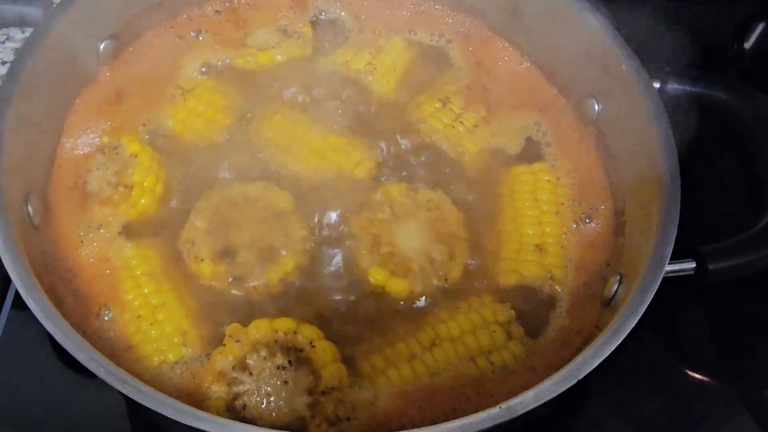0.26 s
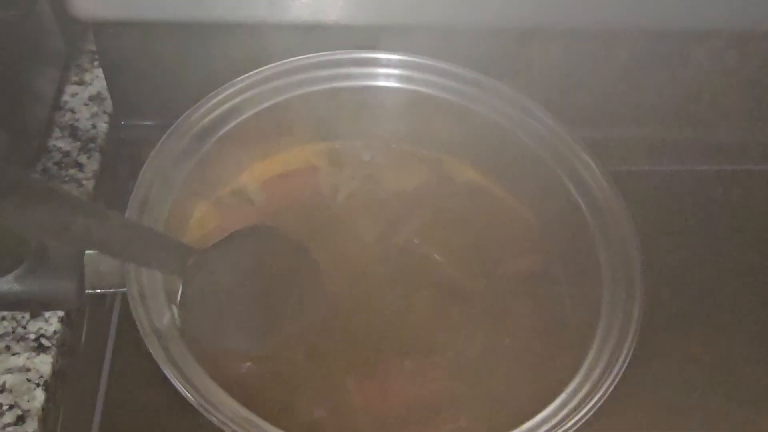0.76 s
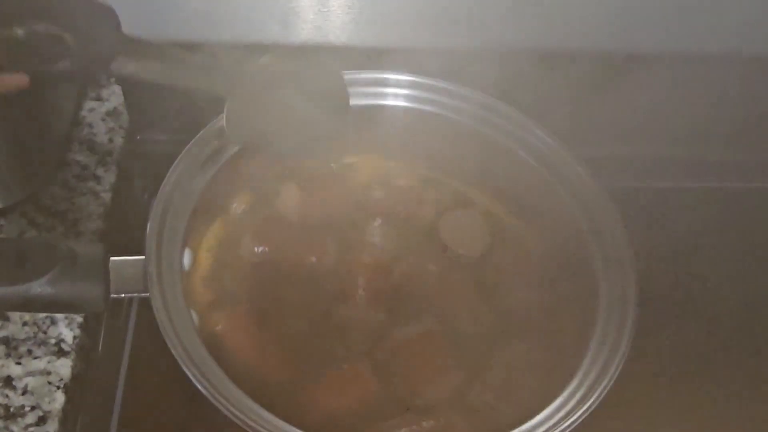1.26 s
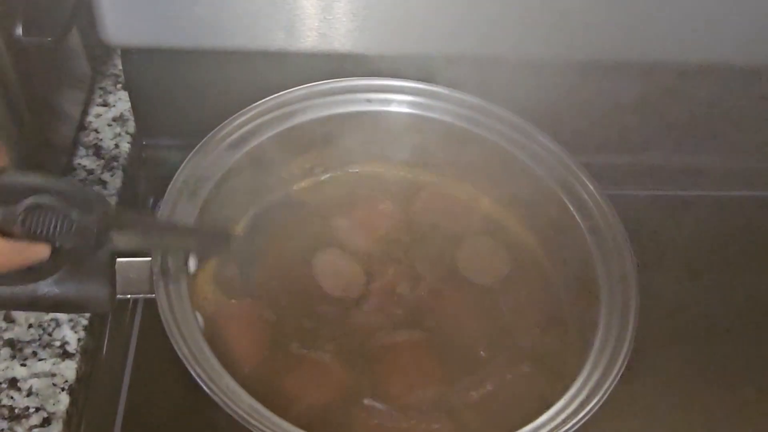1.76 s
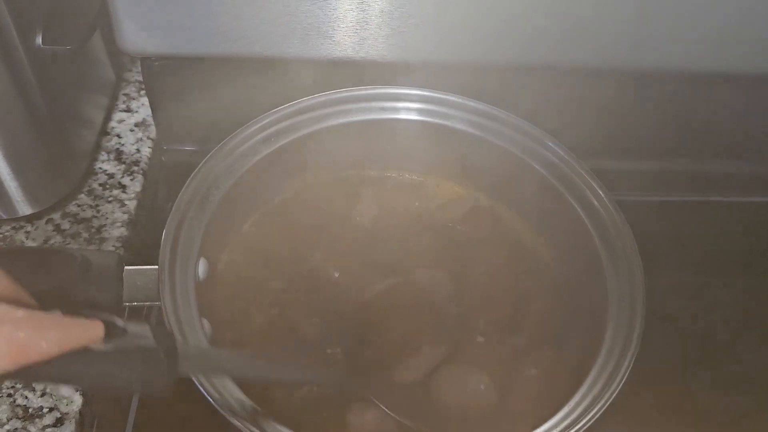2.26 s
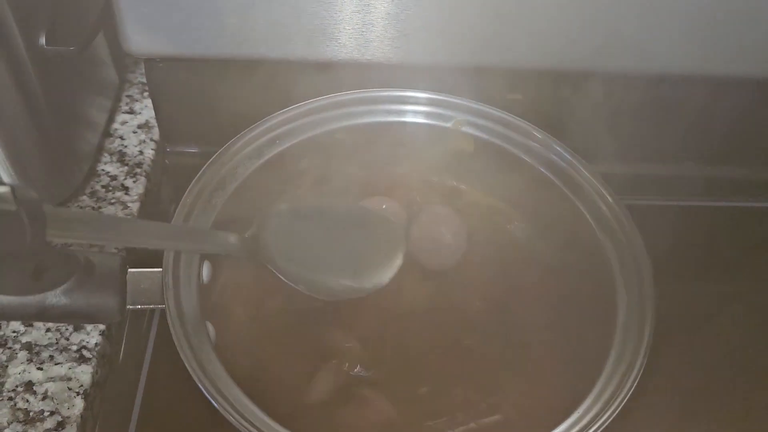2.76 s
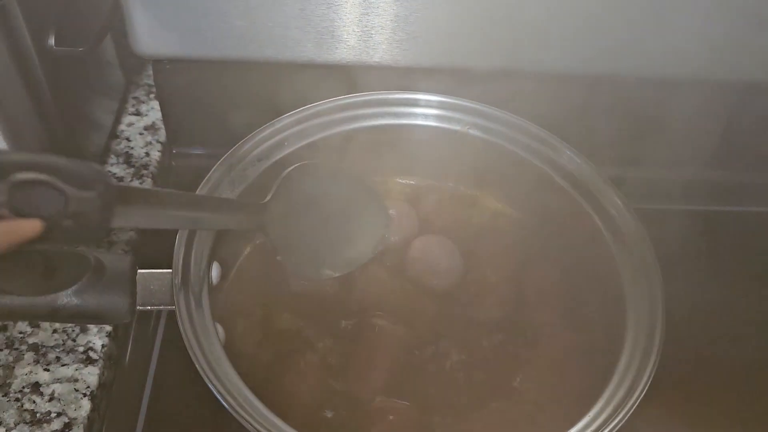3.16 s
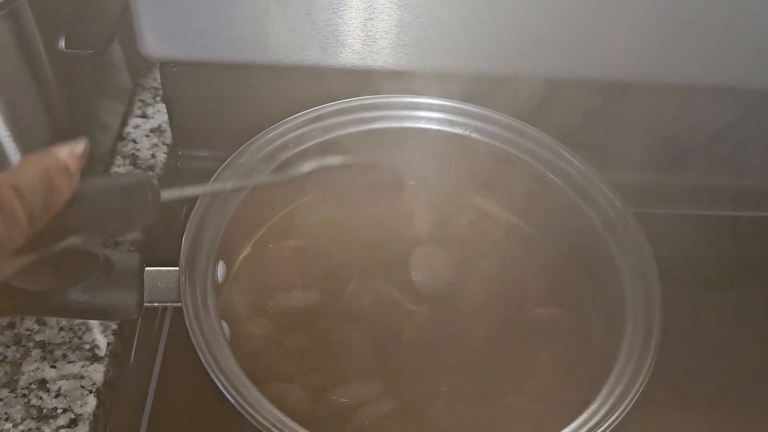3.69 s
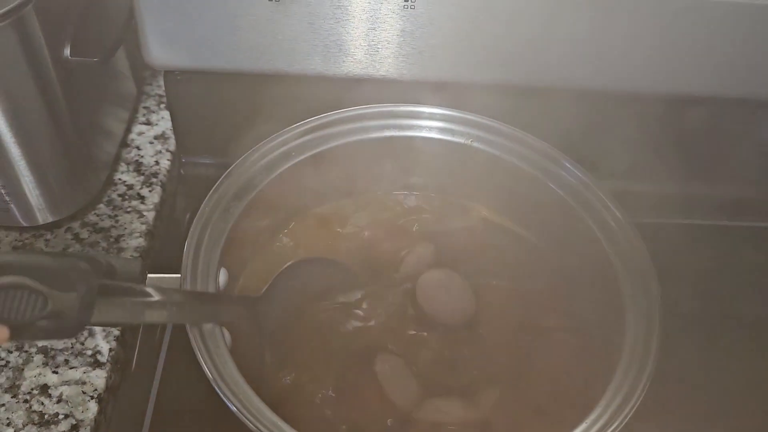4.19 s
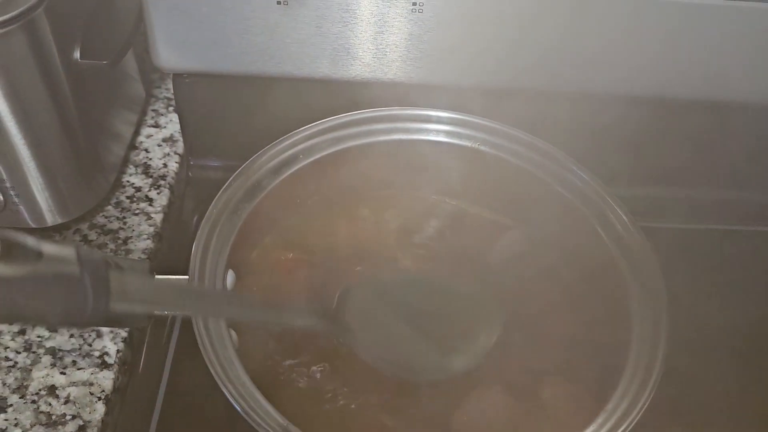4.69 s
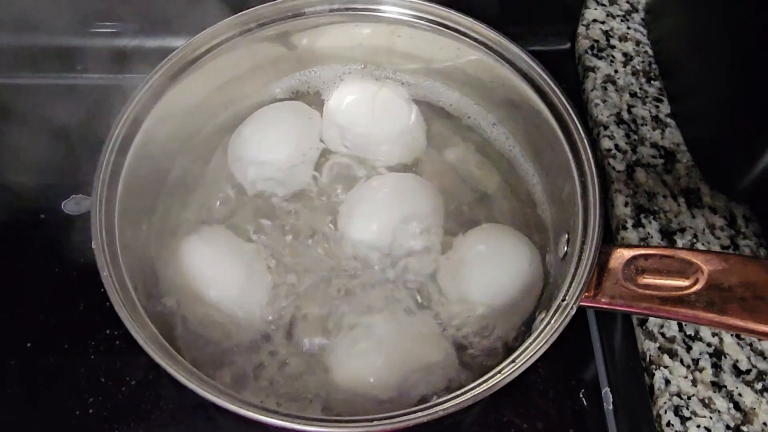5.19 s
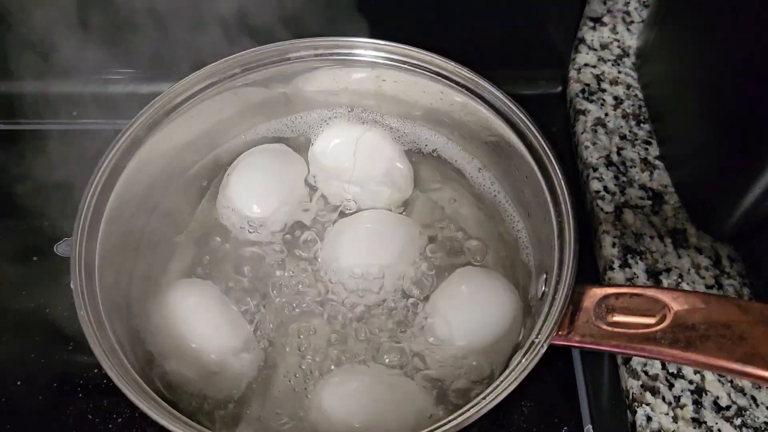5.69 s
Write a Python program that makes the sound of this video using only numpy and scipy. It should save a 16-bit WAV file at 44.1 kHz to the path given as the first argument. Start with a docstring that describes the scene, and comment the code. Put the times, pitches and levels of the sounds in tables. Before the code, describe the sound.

A pot boils close by, with low bubble thumps, higher pops and a fine fizz over the hiss and hum of an extractor fan. At about 0.65 seconds everything cuts out for an instant and a second pot takes over. From 0.7 to 1.9 seconds steel tongs, slightly left, clink against its wall and rim, ringing briefly, scraping and squeaking with a light kitchen echo. Louder plops and spitting droplets stand out from about 1.7 to 3.6 seconds, with one more clink near 2.9. Two strong clinks land at 3.6 and 3.85, followed by scrapes and small squeaks, then a faint hinge creak around 4.3 to 4.5. Another split-second silence comes at 4.8. A third pot then boils, and from 5 seconds until the end near 6, eggs knock softly and irregularly against the steel. The fan changes tone slightly with each pot.

```python
"""Steam bubbles thump and pop in a boiling pot, over the hiss and hum of an extractor fan. Three pots boil one
after another; the scene changes twice, each time after a brief silence. Big bubbles collapse at the bottom,
small ones burst at the surface, and droplets spit. In the second pot steel tongs clink and ring the steel,
scrape and squeak by stick-slip friction, and creak at the hinge. In the third, eggs knock on the steel."""
import sys
import numpy as np
from scipy import signal
from scipy.fft import rfft, irfft, next_fast_len
from scipy.io import wavfile
from scipy.ndimage import uniform_filter1d

SR = 44100
rng = np.random.default_rng(int(sys.argv[2]) if len(sys.argv) > 2 else 0)


def store_pcm(level_fs):
    """Save levels as 16-bit WAV."""
    pcm = np.round(np.clip(level_fs, -1, 1) * 32767).astype(np.int16)
    wavfile.write(sys.argv[1], SR, np.atleast_2d(pcm).T)


N = 261954
T = np.arange(N) / SR

# Each row: time in seconds, thump level in dB, pop level in dB.
BOIL_LEVELS = [(0.0, -43, -48), (0.54, -47, -57), (0.86, -39.5, -47.5), (1.1, -47, -49.5),
               (1.55, -41, -53.5), (1.751, -45.5, -41), (2.18, -43, -46.5), (2.4, -49, -49),
               (2.9, -46, -47), (3.5, -48, -49), (3.85, -40.5, -48.5), (4.3, -46.5, -48.5),
               (4.65, -41.5, -47.5), (4.98, -46, -52), (5.2, -44.5, -46.5), (5.5, -46.5, -60),
               (5.94, -42.5, -49)]
# Each row: start in seconds, level in dB, pitch in Hz.
LOUD_BUBBLES = [(0.161, -22.5, 202), (0.322, -31, 775), (0.526, -36, 660), (1, -22.5, 165),
                (1.74, -22.5, 199), (1.773, -17.5, 806), (1.884, -34, 687), (1.918, -25, 208),
                (2.004, -33, 620), (2.018, -27, 202), (2.065, -29, 590), (2.142, -31, 178),
                (2.324, -39, 730), (2.349, -31, 205), (2.378, -27, 840), (2.429, -31, 220),
                (2.495, -36, 850), (2.513, -17, 895), (2.581, -27.5, 181), (2.659, -26.5, 188),
                (2.697, -30.5, 870), (2.713, -24, 880), (2.804, -29, 187), (2.825, -28.5, 945),
                (2.99, -23.5, 865), (3.131, -25.5, 144), (3.132, -28.5, 770), (3.196, -25, 195),
                (3.276, -25.5, 197), (3.308, -29.5, 173), (3.502, -30.5, 890), (3.548, -39, 165),
                (3.606, -27, 846), (3.943, -30, 194), (4.061, -29, 177), (4.224, -25, 215),
                (4.232, -31.5, 1160), (4.509, -27.5, 216), (4.579, -23, 188), (4.682, -27, 195),
                (4.704, -25.5, 805), (4.776, -28.5, 806), (4.779, -24, 174)]
# Each row: start in seconds, level in dB, band frequency in Hz.
DROPLET_SPITS = [(1.8836, -43, 2950), (2, -39.5, 3170), (2.028, -46, 2840), (2.39, -43, 3180),
                 (2.662, -42.5, 3000), (2.6797, -41, 3100), (2.755, -47, 2870), (3.2774, -45, 3600),
                 (3.95, -34.5, 2960), (4.155, -44.5, 3020), (4.2577, -46, 6150), (4.4304, -39, 8400),
                 (4.7942, -47, 6110), (4.876, -42.5, 6080), (5.1194, -47.5, 6200), (5.4854, -51, 2920),
                 (5.811, -40, 5600)]


def boil():
    """Steam bubbles collapse low at the bottom and pop higher at the surface; droplets spit."""
    times, thump_db, pop_db = np.transpose(BOIL_LEVELS)
    thumps = bubble_crowd(count=500, lo_hz=166, hi_hz=251.3, cycles=9.5, scatter_db=2)
    pops = bubble_crowd(count=1800, lo_hz=266.6, hi_hz=1270, cycles=4.55, scatter_db=4)
    fizz = bubble_crowd(count=1400, lo_hz=1600, hi_hz=9300, cycles=8, scatter_db=-3)
    crackles = bubble_crowd(count=250, lo_hz=4030, hi_hz=14000, cycles=1.6, scatter_db=1)
    out = undb(np.interp(T, times, thump_db)) * thumps + undb(np.interp(T, times, pop_db)) * pops
    out += undb(-65.5) * fizz + undb(-71) * crackles
    for start, db, hz in LOUD_BUBBLES:
        add(out, start, undb(db) * bubble(hz, cycles=6, glide=0.05))
    for start, db, hz in DROPLET_SPITS:
        noise = rng.standard_normal(900)
        add(out, start, burst(noise, db, hz / 2, hz * 1.56, hold_ms=0.21, fade_ms=4.7))
    return out


def bubble(hz, cycles, glide):
    """A breathing bubble: quick swell, decay to 1/20 over its cycles, pitch rising near the surface."""
    n = hz * np.arange(int(2 * cycles * SR / hz)) / SR
    envelope = (1 - np.exp(-n / 0.28)) * np.exp(-3 * n / cycles)
    return envelope * np.sin(2 * np.pi * n * (1 + glide * n / cycles))


def bubble_crowd(count, lo_hz, hi_hz, cycles, scatter_db):
    """Many small bubbles at random moments; the low ones are larger and louder."""
    out = np.zeros(N)
    for when, pitch, rank in rng.random((count, 3)):
        db = -scatter_db * np.log(rank + 0.028) - 6 * pitch
        hz = lo_hz * (hi_hz / lo_hz) ** pitch
        add(out, when * N / SR, undb(db) * bubble(hz, cycles, glide=0.079))
    return unit(out)


# Steel rubbing or rattling on steel. Each row: frequency in Hz, gain in dB.
CONTACT_SPECTRUM = [(300, -12.5), (1000, -9), (1400, -2), (2100, -12.5), (2700, -10.5), (3400, -10),
                    (4100, -13), (5800, 2), (7000, -2.5), (9000, -6.5), (12000, -8), (16000, -8.5)]
# Steel modes; contact noise stirs the short ones. Each row: frequency in Hz, gain in dB, T60 in seconds.
SHORT_MODES = [(183, -37, 0.081), (446.4, -49, 0.1), (573, -36, 0.088), (745, -35.5, 0.039),
               (1450, -53, 0.075), (2910, -46, 0.13), (3330, -55, 0.11), (3980, -51, 0.096),
               (4624, -43, 0.072), (5030, -37, 0.032), (5610, -44, 0.051), (5680, -53, 0.016),
               (6230, -55, 0.032), (6770, -42.5, 0.12), (6890, -33, 0.021), (7540, -35, 0.026),
               (8320, -39, 0.057), (10100, -55, 0.017), (12030, -27, 0.02), (13900, -52, 0.066),
               (14780, -39, 0.11), (15740, -54, 0.058)]
TONG_MODES = [(2910, -1, 0.22), (2970, -13, 0.75), (5590, -8.5, 0.075), (8240, -5.5, 0.27),
              (10600, -7, .11), (14640, -14, .12), (15650, -8, 0.17)]
WALL_MODES = [(1240, -22, 0.061), (1636, -7, 0.044), (1896, -2, 0.023), (2030, -13, 0.085),
              (2317, -14, .06), (2435, -5, 0.088), (2514, -7.5, 0.11), (2595, -8.5, 0.16)]
RIM_MODES = [(2705, -17, 0.08), (2790, -4.5, 0.19), (2894, -6.5, 0.15), (2940, -1, 0.16), (3010, -8, .16),
             (3240, -3, 0.037), (3318, -6.5, 0.13), (5560, -10.5, 0.1)]


def tongs():
    """Blows and friction ring the tongs, pot wall and rim; squeaks and a creak sound alongside."""
    rub, hiss = scrapes()
    squeal = squeaks()
    rattle, (tong_blows, wall_blows, rim_blows) = clinks()
    contact = hiss + colour(band(rub, 510, 2920) + rattle, CONTACT_SPECTRUM)
    out = contact + sum(undb(db) * ring(contact, hz, t60) for hz, db, t60 in SHORT_MODES)
    out += sum(undb(db) * ring(tong_blows, hz, t60) for hz, db, t60 in TONG_MODES)
    for blows, rub_db, modes in [(wall_blows, -48, WALL_MODES), (rim_blows, -54, RIM_MODES)]:
        force = blows + undb(rub_db) * rub
        # boiling soup against the steel makes each mode waver on its own
        out += sum(undb(db + 5.5 * walk(90)) * ring(force, hz, t60) for hz, db, t60 in modes)
    return out + squeal + hinge_creak()


# Each row: start in seconds, rattle, knock and bright levels in dB, rattle hold in ms,
# blows to tongs, wall and rim in dB.
TONG_CLINKS = [(0.7286, -19, -23.5, -21, 5, -70, -41, -43), (0.7679, -20, -36, -18.5, 2.1, -42, -42, -33),
               (.893, -18.5, -18.5, -19, 4.9, -70, -35, -35), (0.9469, -15, -20, -17, 3.9, -58, -59, -39),
               (0.9979, -10.5, -32, -13, 5.2, -51, -25, -30), (1.266, -13, -18, -7, 4.2, -40, -54, -30.5),
               (1.3898, -51, -61, -24, 8.5, -45, -69, -36), (1.5532, -8.5, -6, -11, 0.5, -59, -16, -28),
               (2.791, -33.5, -35.5, -29.5, 2.4, -65, -69, -62),
               (2.9443, -16.5, -19.5, -15.5, 1.2, -30, -39, -52),
               (3.624, -8.5, -13, -19, 5.5, -33, -28, -23), (3.7558, -46, -35, -29.5, 6.3, -53, -47, -32),
               (3.843, -4.5, -7, -14.5, 1.2, -57, -17.5, -31)]


def clinks():
    """Tongs strike the pot: returns rattling contact noise and the impulses on tongs, wall and rim."""
    rattle, blows = np.zeros(N), np.zeros((3, N))
    for start, rattle_db, knock_db, bright_db, hold_ms, *blow_dbs in TONG_CLINKS:
        noise = rng.standard_normal(4000)
        # a heavy, dull blow reaches less high
        top_hz = np.clip(17000 * undb(bright_db - rattle_db + 5.5), 9500, 17000)
        bands = [(rattle_db, 1500, 4200), (knock_db, 400, 1500), (knock_db, 150, 480),
                 (bright_db, 3600, top_hz)]
        for db, lo_hz, hi_hz in bands:
            add(rattle, start, burst(noise, db, lo_hz, hi_hz, hold_ms, fade_ms=5))
            crack_db = db + 3.5 - 1.3 * hold_ms  # the first touch cracks harder in a short rattle
            crack = burst(noise[::-1], crack_db, lo_hz, hi_hz, hold_ms=1, fade_ms=1.36)
            add(rattle, start + 0.0012, crack)
        for force, db in zip(blows, blow_dbs):
            add(force, start, [undb(db)])
    return rattle, blows


# Each row: start and end in seconds, rub and hiss levels in dB, level change over the stroke in dB.
SCRAPE_STROKES = [(0.761, 0.799, -20, -58, -13), (0.823, 0.868, -40, -52, 8),
                  (0.955, 1.2, -30.5, -50.5, -17), (1.28, 1.33, -25.5, -30, -26),
                  (1.34, 1.392, -41, -48, 8), (1.402, 1.469, -35.5, -49.5, 7.5),
                  (1.54, 1.673, -34, -42.5, -16), (1.66, 1.762, -26.5, -51, 0),
                  (1.748, 1.869, -36, -46.5, 10), (2.198, 2.31, -38.5, -76, -13),
                  (3.626, 3.748, -19, -36, -20.5), (3.762, 3.844, -43, -56, 12), (3.83, 3.92, -23, -48, -9),
                  (3.931, 4.034, -28, -56.5, 4.5), (4.03, 4.138, -35, -49.5, 4)]


def scrapes(edge_s=0.011):
    """Tongs drag on the wall, swelling when pressed, dying in a skid: returns rubbing force and hiss."""
    force, hiss = np.zeros((2, N))
    grit = undb(3 * walk(300))
    rub, fine = grit * rng.standard_normal((2, N))
    fine = unit(colour(band(fine, 5800, SR / 2), CONTACT_SPECTRUM))
    for start, end, rub_db, hiss_db, swell_db in SCRAPE_STROKES:
        on = slice(int(start * SR), int(end * SR))
        edges = np.clip(np.minimum(T[on] - start, end - T[on]) / edge_s, 0, 1)
        pressure = edges * undb(swell_db * (T[on] - start) / (end - start))
        force[on] += pressure * undb(rub_db) * rub[on]
        hiss[on] += pressure * undb(hiss_db) * fine[on]
    return force, hiss


# Each row: start and end in seconds, first and last pitch in Hz, level in dB.
STEEL_SQUEAKS = [(0.723, 0.786, 690, 685, -39), (1.66, 1.75, 1210, 1174, -36.5),
                 (1.744, 1.875, 1206, 1308, -35.5), (3.945, 4.022, 717, 711, -32),
                 (4.037, 4.123, 1277, 1204, -43)]


def squeaks():
    """Steel grips and slips on steel: a rough, gliding tone of three harmonics."""
    out = np.zeros(N)
    jitter, grip = 1 + 0.065 * walk(400), undb(4 * walk(90))
    for start, end, first_hz, last_hz, db in STEEL_SQUEAKS:
        on = slice(int(start * SR), int(end * SR))
        progress = (T[on] - start) / (end - start)
        hz = (first_hz + (last_hz - first_hz) * progress) * jitter[on]
        phase = 2 * np.pi * np.cumsum(hz) / SR
        tone = np.sin(phase) + 0.4 * np.sin(2 * phase) + 0.12 * np.sin(3 * phase)
        out[on] += undb(db) * np.sin(np.pi * progress) * grip[on] * tone
    return out


def hinge_creak(start_s=4.299, gap_s=0.016, slips=12, hz=1880, level_db=-44.5):
    """The hinge of the tongs creaks in an uneven run of slips."""
    out = np.zeros(N)
    for due in start_s + gap_s * np.arange(slips):
        lag, size, *noise = rng.standard_normal(900)
        slip = burst(noise, level_db + 2 * size, hz / 1.3, hz * 1.245, hold_ms=0.6, fade_ms=5.6)
        add(out, due + 0.098 * gap_s * lag, slip)
    return out


# Each row: start in seconds, level in dB.
EGG_KNOCKS = [(5.007, -28.5), (5.038, -29), (5.118, -32), (5.198, -32), (5.308, -41), (5.361, -33),
              (5.433, -31), (5.481, -33), (5.565, -34), (5.62, -31.5), (5.708, -34.5), (5.774, -37),
              (5.809, -23.5), (5.824, -25.5), (5.88, -34)]
# Each row: frequency in Hz, gain in dB, T60 in seconds.
EGG_POT_MODES = [(218, -1, 0.093), (282.4, -4.5, 0.1), (478, -8.5, 0.072), (737, -20.5, 0.047),
                 (1418, 5, 0.04), (1830, -6.5, 0.13), (2040, -8, 0.1)]


def eggs(treble_db=-25):
    """Eggs tumble against the steel; their soft blows hardly stir its upper modes."""
    starts, knock_db = np.transpose(EGG_KNOCKS)
    out = np.zeros(N)
    for hz, mode_db, t60 in EGG_POT_MODES:
        db = mode_db + knock_db + treble_db * (hz > 1000) + 2 * rng.standard_normal(len(starts))
        force = np.zeros(N)
        force[(starts * SR).astype(int)] = undb(db)
        out += ring(force, hz, t60)
    return out


# Silences between pots. Each row: start and end in seconds.
POT_GAPS = [(.6412, .6862), (4.813, 4.8506)]
# One spectrum per pot. Each row: frequency in Hz, relative density in dB.
FAN_SPECTRA = [
    [(15, -37), (25, 3.5), (149, -13), (195, -6), (256, -20), (309, -4), (405, -17), (451, -8.5),
     (714, -26), (796, -17.5), (1840, -31), (4250, -30), (10100, -42), (11600, -32), (16000, -42)],
    [(15, -41), (25, -5.5), (55, 6.5), (123, -5.5), (200, 6), (363, -54), (591, -19), (796, -11.5),
     (988, -35), (1190, -18.5), (1700, -27), (3620, -27), (10400, -35), (11900, -27.5), (16000, -36.5)],
    [(15, -43.5), (25, 4.5), (108, -2.5), (161, -26), (212, -3.5), (394, -20), (489, -12), (575, -16.5),
     (1190, -27.5), (1400, -22), (1700, -33.5), (6210, -28), (10100, -43), (11900, -28), (16000, -40)],
]
# One level per pot.
FAN_NOISE_DB = [-45, -43, -43.5]
FAN_HUM_DB = [-46.5, -49, -43.5]


def fan(hum_hz=117.4):
    """Fan noise and motor hum, different at each pot; the treble flickers with the simmer."""
    pot = np.searchsorted([end for _, end in POT_GAPS], T)
    noise = rng.standard_normal(N)
    noise += band(noise, 2500, 16000) * (undb(1.1 * walk(60)) - 1)
    air = [undb(db) * unit(colour(noise, spectrum)) for spectrum, db in zip(FAN_SPECTRA, FAN_NOISE_DB)]
    hum = undb(np.take(FAN_HUM_DB, pot) + 0.5 * walk(17)) * np.sin(2 * np.pi * hum_hz * T)
    return np.choose(pot, air) + hum


def kitchen_echo(x, t60_s=0.5, level_db=-14):
    """A diffuse tail of reflections; tiles and steam swallow the top."""
    t = T[:SR]
    envelope = np.exp(-np.log(1000) * t / t60_s) * (1 - np.exp(-t / 0.0073))
    tail = band(rng.standard_normal(SR) * envelope, 92, 9200)
    return undb(level_db) * signal.fftconvolve(x, tail / np.sqrt(np.sum(tail ** 2)))[:N]


def burst(noise, db, lo_hz, hi_hz, hold_ms, fade_ms):
    """A puff of band noise that holds, then dies away."""
    ms = np.arange(len(noise)) / SR * 1000
    envelope = np.exp(-np.maximum(ms - hold_ms, 0) / fade_ms) * (1 - np.exp(-ms / 0.5))
    return undb(db) * envelope * unit(band(noise, lo_hz, hi_hz))


def ring(force, hz, t60):
    """One mode: a unit impulse gives a decaying sine of height 1."""
    r, w = np.exp(-np.log(1000) / (t60 * SR)), 2 * np.pi * hz / SR
    return signal.lfilter([0, r * np.sin(w)], [1, -2 * r * np.cos(w), r * r], force)


def colour(x, points, smear_s=0):
    """Shapes x by (Hz, dB) points; a smear scatters each frequency's delay by about that time."""
    size = next_fast_len(N + SR)
    hz = np.maximum(np.arange(size // 2 + 1) * SR / size, 1)
    point_hz, point_db = np.transpose(points)
    gain = undb(np.interp(np.log(hz), np.log(point_hz), point_db))
    if smear_s:
        taps = rng.standard_normal(4096) * np.exp(-np.arange(4096) / (smear_s * SR))
        gain = gain * np.exp(1j * np.angle(rfft(taps, size)))
    return irfft(rfft(x, size) * gain, size)[:N]


def walk(rate_hz):
    """Random steps, smoothed twice; spread near 1."""
    hold = int(SR / rate_hz)
    steps = np.repeat(rng.standard_normal(N // hold + 1), hold)
    return 1.154 * uniform_filter1d(uniform_filter1d(steps, hold), hold)[:N]


def band(x, lo_hz, hi_hz):
    sos = signal.butter(2, [lo_hz, min(hi_hz, 0.45 * SR)], "bandpass", fs=SR, output="sos")
    return signal.sosfilt(sos, x)


def add(out, start_s, x):
    i = int(start_s * SR)
    out[i:i + len(x)] += x[:max(N - i, 0)]


def undb(db):
    return 10 ** (np.asarray(db) / 20)


def unit(x):
    return x / np.sqrt(np.mean(x ** 2))


# Each row: frequency in Hz, side level against mid in dB.
STEREO_WIDTH = [(60, -24.5), (200, -17.5), (380, -9), (700, -6), (1300, -0.5), (2400, 0), (16000, -0.5)]


def scene():
    """Close pots over echo and fan; the channels agree in the bass and take unrelated treble paths."""
    steel = tongs()
    echo = kitchen_echo(steel)
    close = steel + boil() + eggs()
    far = echo + fan()
    side = colour(close, STEREO_WIDTH, smear_s=0.0023) + colour(far, STEREO_WIDTH, smear_s=0.0276)
    side += 0.39 * band(steel, 400, 2400)  # the tongs sit left
    return np.array([close + far + side, close + far - side])


def record(dry):
    """Rounds the loudest peaks, cuts the deepest bass and the top, and mutes between pots."""
    ceiling, low_hz, top_hz = 1.5, 30, 15950
    highpass = signal.butter(4, low_hz, "highpass", fs=SR, output="sos")
    lowpass = signal.ellip(10, 0.2, 70, top_hz, fs=SR, output="sos")
    gate = np.all([(T < start) | (T > end) for start, end in POT_GAPS], axis=0)
    rounded = ceiling * np.tanh(dry / ceiling)
    return signal.sosfilt(lowpass, signal.sosfilt(highpass, rounded) * gate)


dry = scene()
out = record(dry)
store_pcm(out)
```